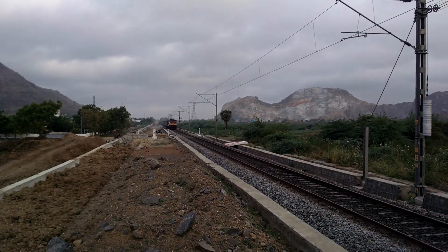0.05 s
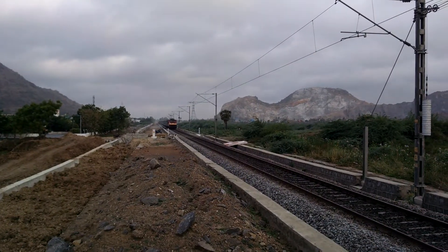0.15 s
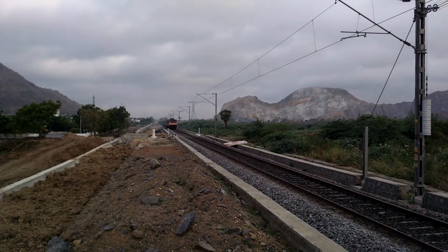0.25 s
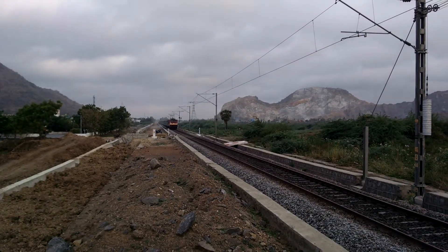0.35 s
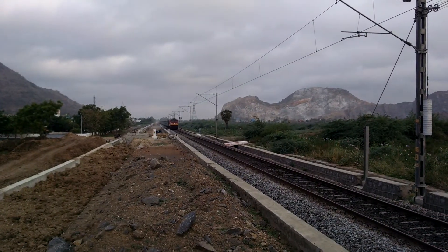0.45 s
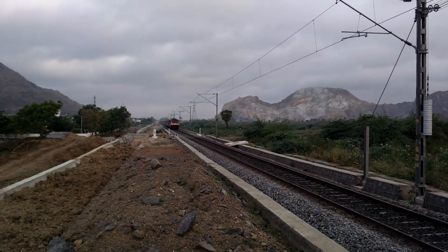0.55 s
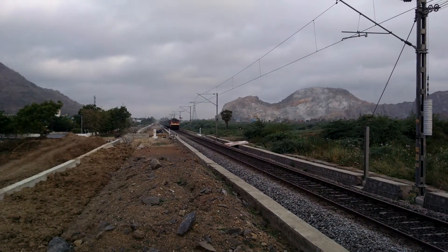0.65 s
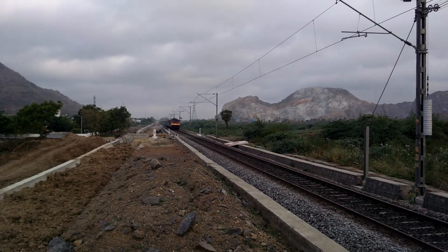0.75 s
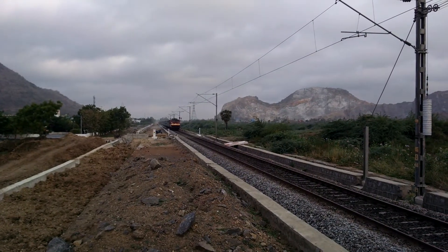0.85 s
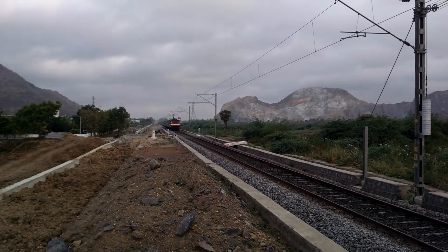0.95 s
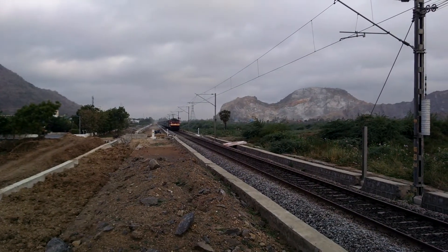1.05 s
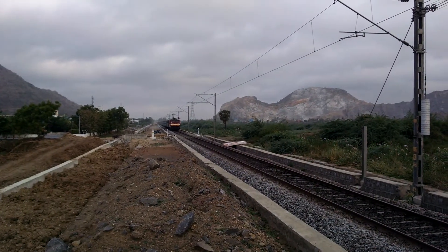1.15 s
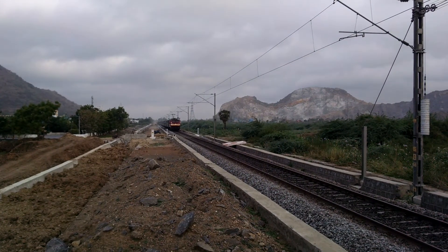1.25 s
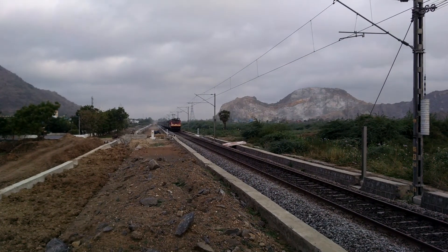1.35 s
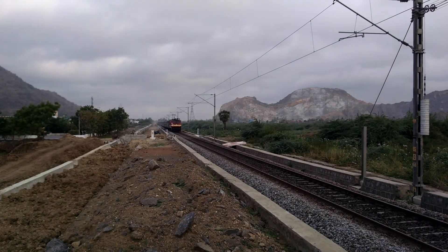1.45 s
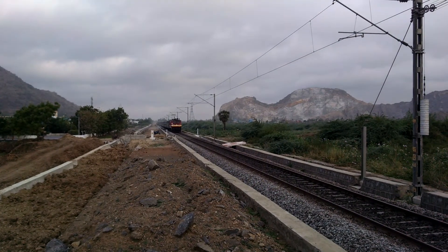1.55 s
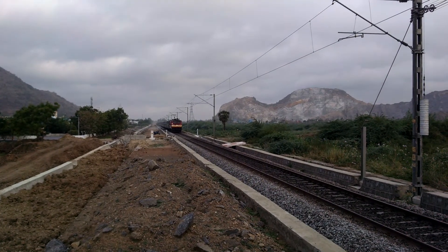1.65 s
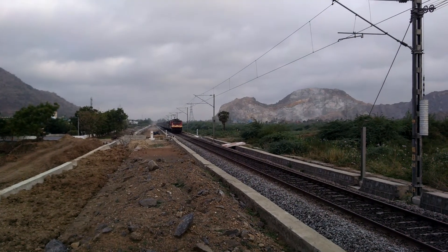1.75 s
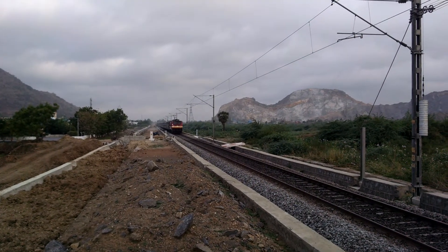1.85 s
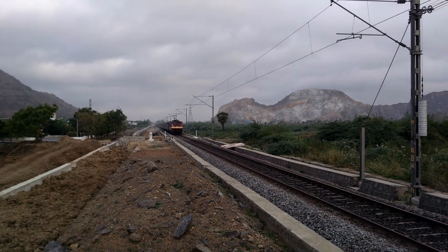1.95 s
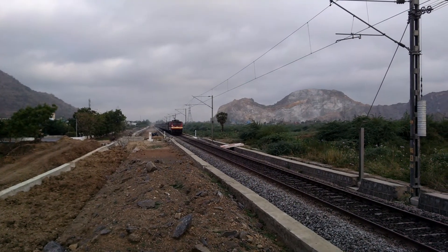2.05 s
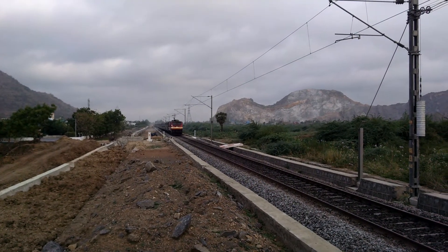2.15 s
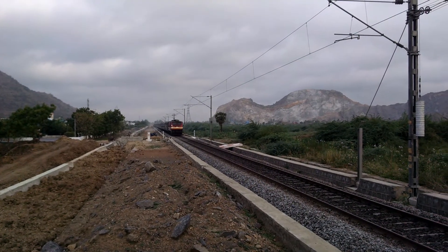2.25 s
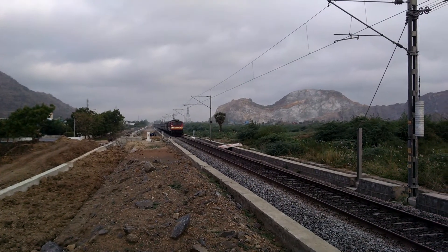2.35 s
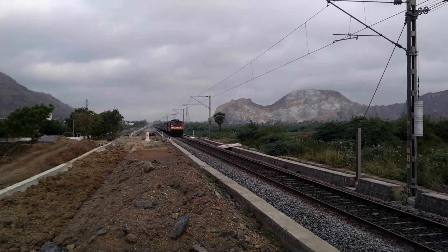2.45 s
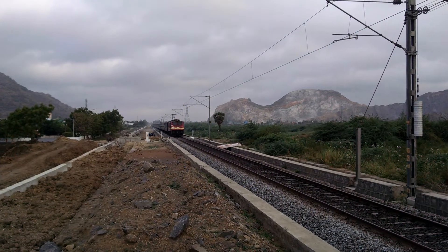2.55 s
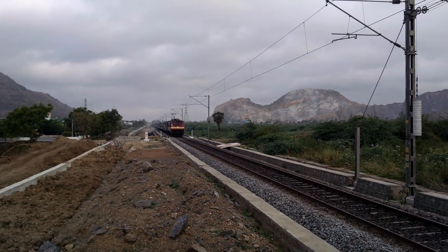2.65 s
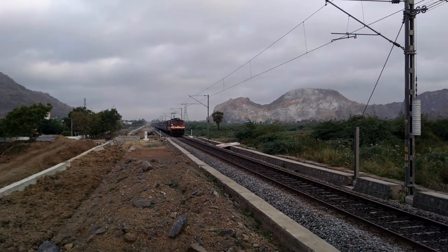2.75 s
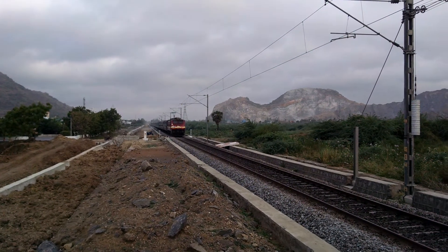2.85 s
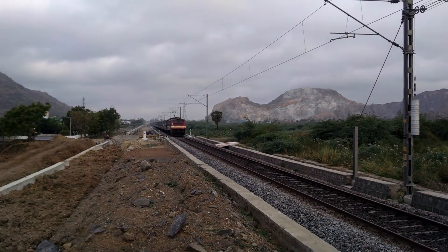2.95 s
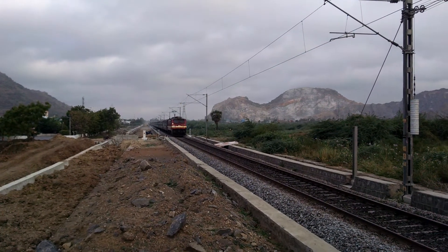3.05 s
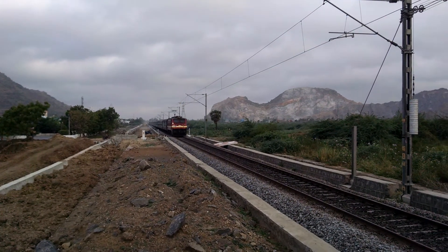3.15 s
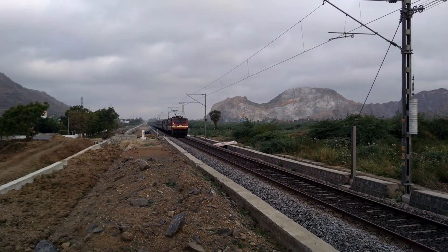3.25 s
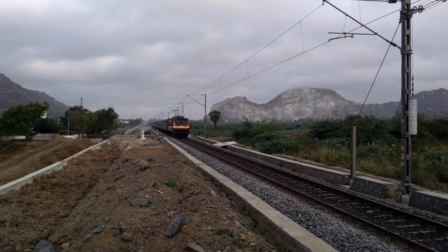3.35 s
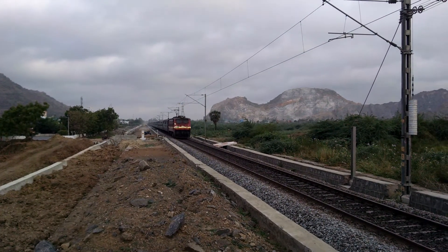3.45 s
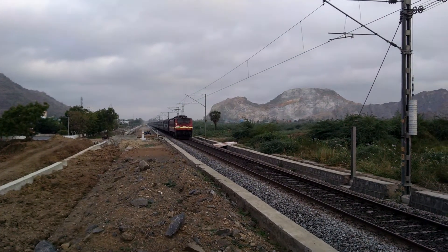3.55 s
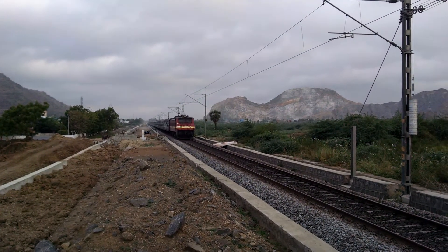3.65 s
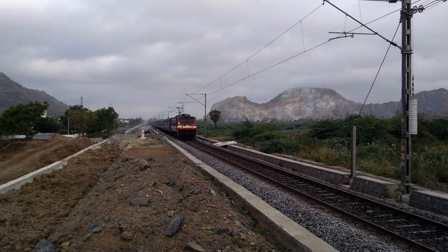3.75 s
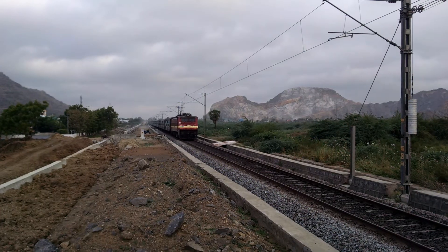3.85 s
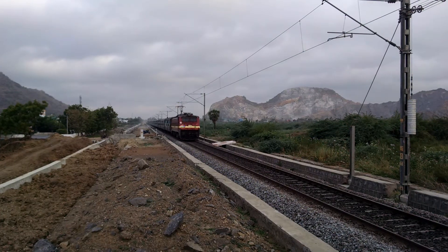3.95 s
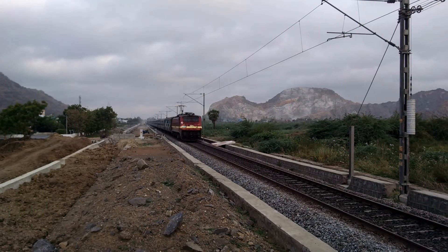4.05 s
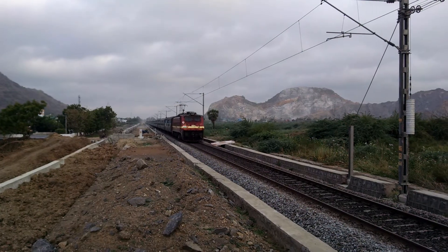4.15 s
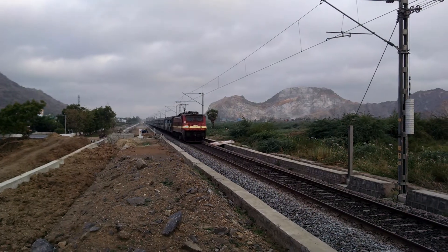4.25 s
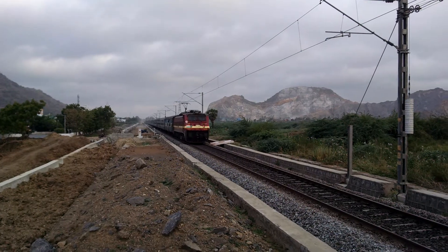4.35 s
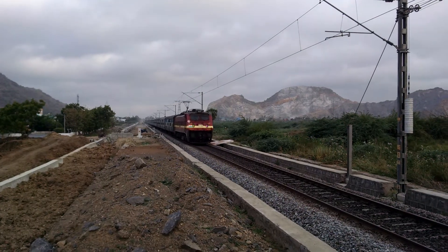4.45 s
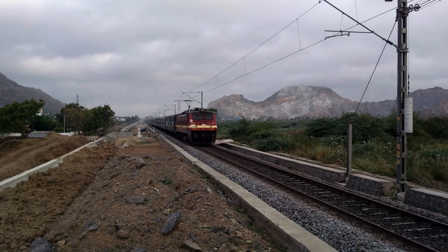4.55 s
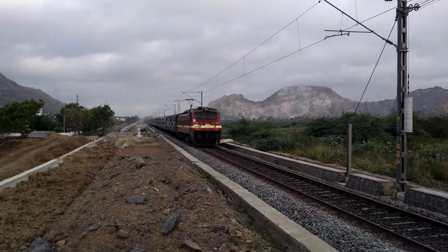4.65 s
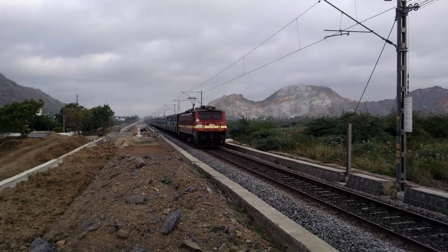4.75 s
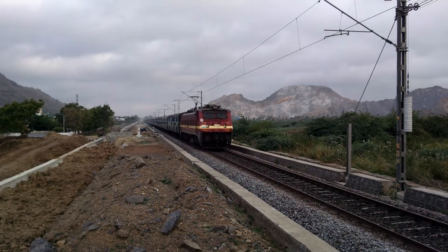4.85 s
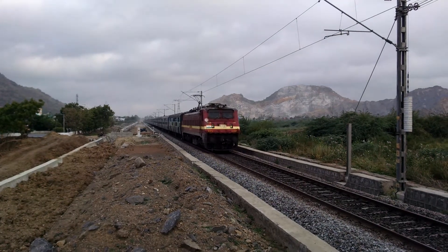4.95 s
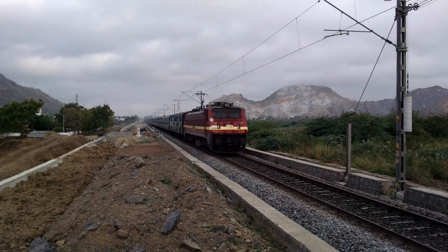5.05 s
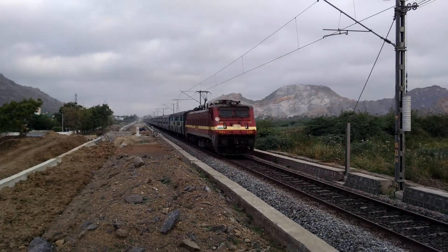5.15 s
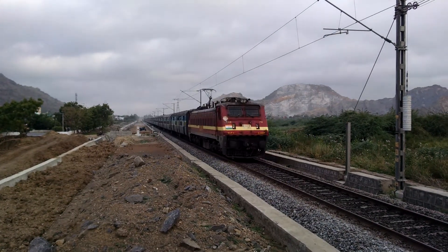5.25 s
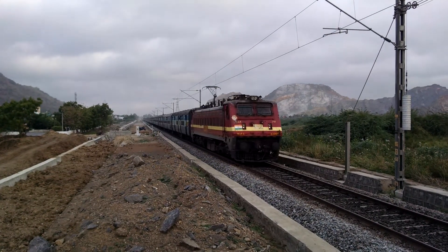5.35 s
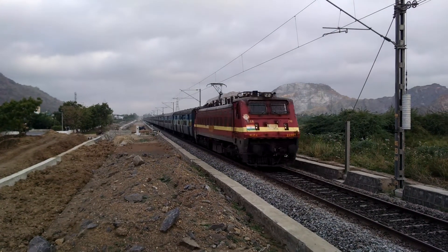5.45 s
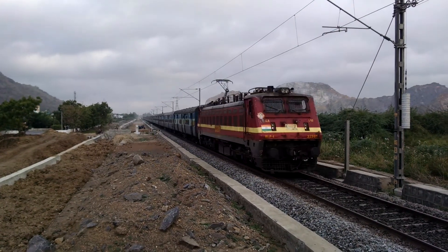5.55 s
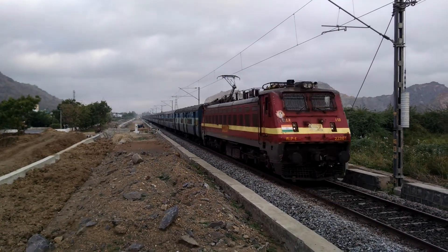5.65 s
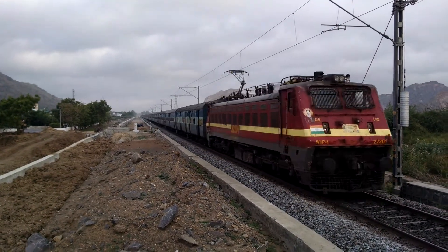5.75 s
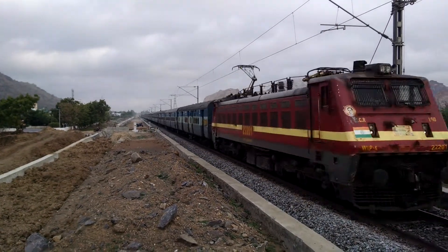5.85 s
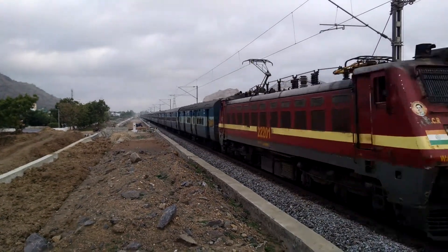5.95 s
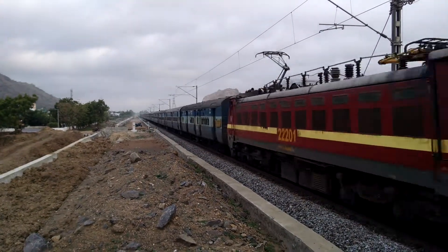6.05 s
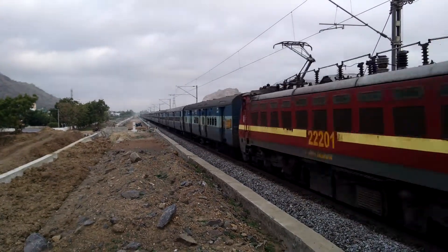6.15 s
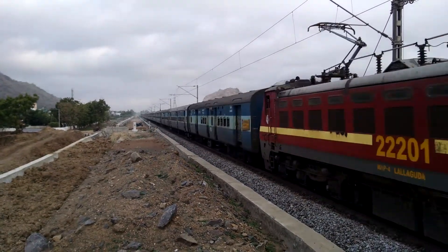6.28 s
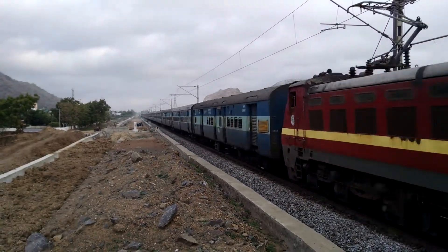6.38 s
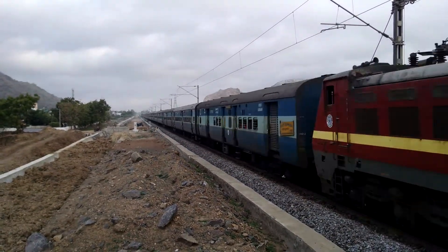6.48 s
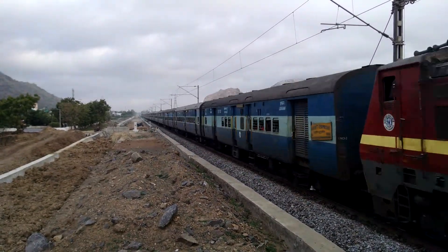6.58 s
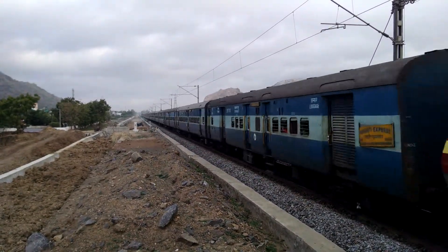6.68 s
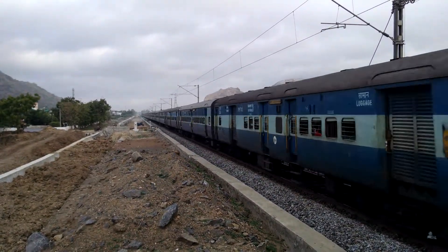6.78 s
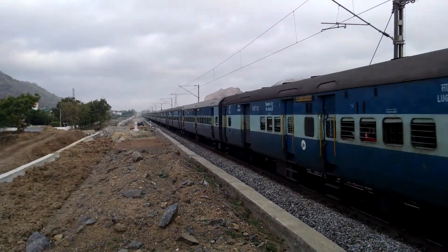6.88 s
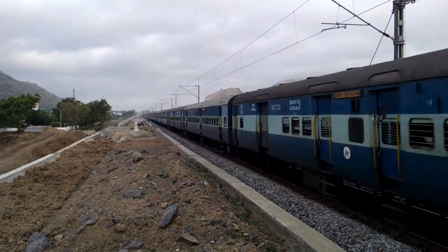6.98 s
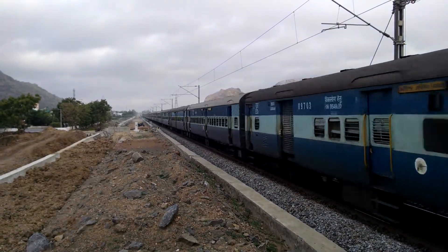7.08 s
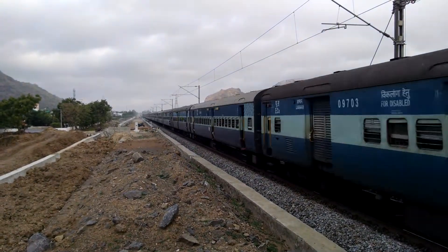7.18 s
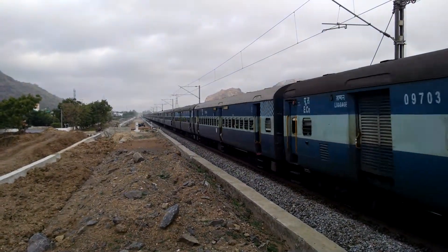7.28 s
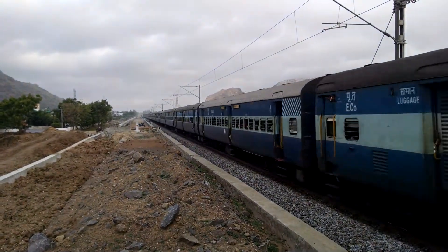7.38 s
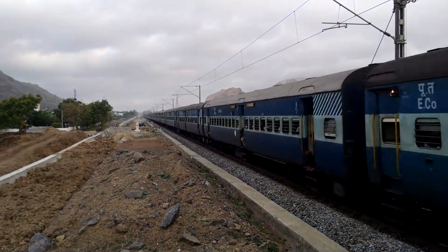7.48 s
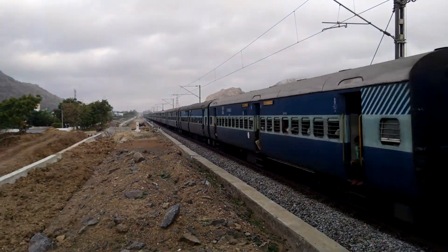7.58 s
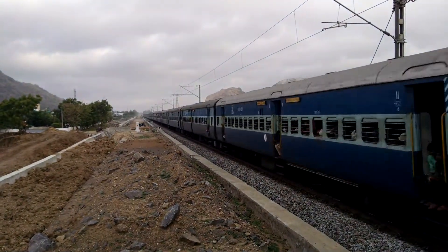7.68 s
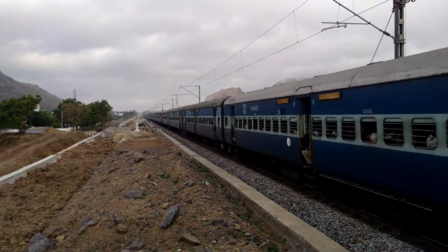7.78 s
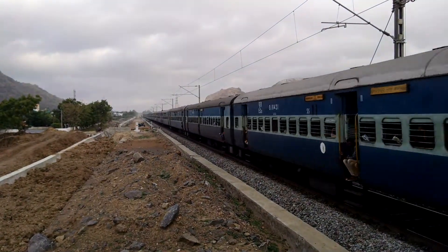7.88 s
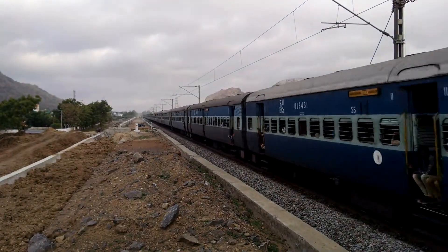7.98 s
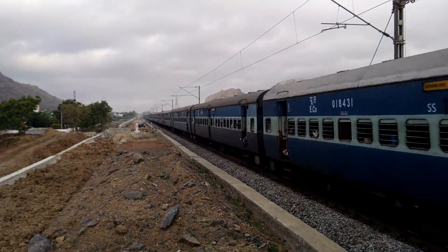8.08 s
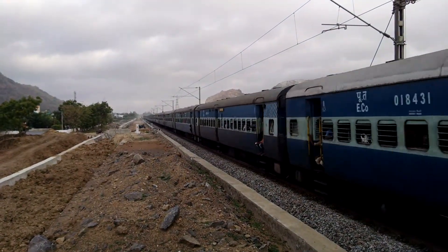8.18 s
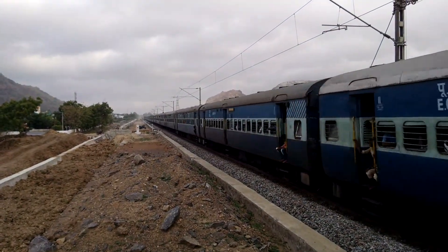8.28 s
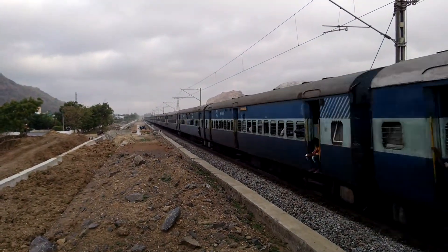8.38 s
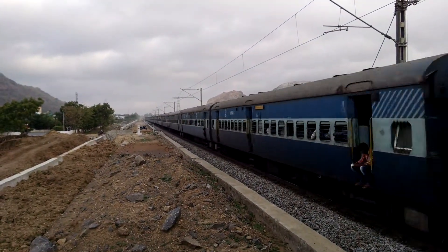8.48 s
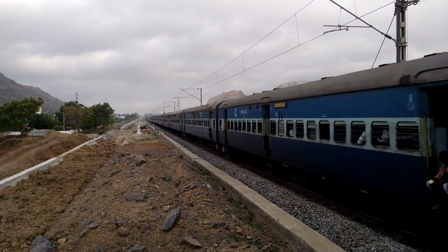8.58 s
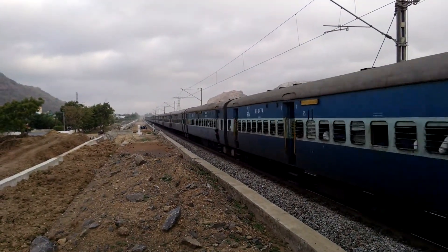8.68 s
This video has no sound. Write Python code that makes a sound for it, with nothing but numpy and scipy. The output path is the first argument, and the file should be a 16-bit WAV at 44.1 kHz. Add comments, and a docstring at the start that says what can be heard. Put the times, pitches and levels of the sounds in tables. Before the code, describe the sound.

A faint far rush with a chirping bird, one long blaring train horn with echoes, then an electric passenger train roars past with paired rail clacks.

```python
"""A deep hum that soon stops and a faint far rush come first, with swells of rumble and a small bird.
One long air-horn blast follows, and the land throws it back lower: reed harmonics plus echo copies.
Then an electric train passes close by: shaped noise roars for the locomotive, then for its coaches.
Paired clicks ring the modes of the rail as axles clack over a joint; loose gear knocks and rattles.
"""
import sys
import numpy as np
from scipy import signal
from scipy.fft import rfft, irfft
from scipy.io import wavfile
from scipy.ndimage import uniform_filter1d

SR = 44100
rng = np.random.default_rng(int(sys.argv[2]) if len(sys.argv) > 2 else 0)


def wav_record(signal):
    """Record a signal, one row per channel, as 16-bit PCM in the file named by sys.argv[1]."""
    frames = np.transpose(np.atleast_2d(signal))
    bounded = np.clip(frames, -1, 1)
    # unit amplitude maps onto the largest positive 16-bit level
    quanta = np.round(bounded * 32767).astype(np.int16)
    wavfile.write(sys.argv[1], SR, quanta)


N = 384552
T = np.arange(N) / SR  # time of each sample, s
HZ = np.maximum(np.fft.rfftfreq(N, 1 / SR), 1)  # frequency of each spectrum bin


def from_db(db):
    """Turn decibels into gain."""
    return 10 ** (np.asarray(db) / 20)


def rms_one(x):
    """Scale to unit power."""
    return x / np.sqrt(np.mean(x ** 2) + 1e-20)


def in_time(rows, t=T):
    """Read each column of a curve at times t, with straight lines between its rows."""
    s, *columns = np.transpose(rows)
    return [np.interp(t, s, c) for c in columns]


def at_hz(points, hz):
    """Read a frequency table on a logarithmic axis."""
    f, value = np.transpose(points)
    return np.interp(np.log(hz), np.log(f), value)


def drift(rate, t=T):
    """Wander at random around 0, heading for a new value `rate` times a second."""
    knots = rng.standard_normal(4096)
    return np.interp(t * rate, np.arange(len(knots)), knots)


def cut(x, hz, kind, order=2):
    """Filter out what lies outside a low, high or middle band (Butterworth)."""
    return signal.sosfilt(signal.butter(order, hz, kind, fs=SR, output="sos"), x)


def band_noise(low_hz, high_hz, shape=N):
    """Make noise of unit power between two frequencies."""
    return rms_one(cut(rng.standard_normal(shape), [low_hz, high_hz], "band"))


def smooth(x, seconds):
    """Follow a signal with a lag, as a one-pole filter does."""
    r = np.exp(-1 / (seconds * SR))
    return signal.lfilter([1 - r], [1, -r], x)


def sides(balance, share=1):
    """Give the left and right gain at each frequency while the total power stays the same."""
    ratio = from_db(share * at_hz(balance, HZ))
    return np.array([ratio, np.ones_like(ratio)]) * np.sqrt(2 / (1 + ratio ** 2))


# Colour of the rolling noise far off, beside the locomotive and beside the coaches.
# Each row: frequency in Hz, relative level in dB per Hz.
FAR_COLOUR = [(20, -1), (45, -0.5), (120, -6), (190, -2), (400, 2.5), (550, -3), (850, -3), (1150, -13),
              (1600, -8.5), (2250, -15.5), (2700, -12.5), (3400, -13.5), (3900, -13), (4500, -22),
              (5100, -21.5), (5700, -25), (6800, -26), (10000, -40), (15500, -60)]
LOCOMOTIVE_COLOUR = [(20, -4.5), (40, -4.5), (100, -4), (220, 0), (460, -1), (580, -4), (780, 0),
                     (1050, -14), (1600, -13), (2250, -18), (2700, -18), (3200, -17.5), (3900, -19.5),
                     (5000, -27.5), (7200, -30), (10000, -37.5), (15500, -54.5)]
COACH_COLOUR = [(20, -20), (90, -4.5), (190, -7), (350, -3), (470, 0.5), (600, -4.5), (810, -9),
                (1000, -10), (1180, -12.5), (1600, -18), (3800, -18.5), (5000, -26), (7200, -30),
                (10000, -37), (15500, -59)]
# How alike left and right are for the far train. Each row: frequency in Hz, likeness from 0 to 1.
FAR_LIKENESS = [(40, .24), (130, 0.76), (400, 0.93), (550, .5), (800, 0.84), (1400, 0.82), (1900, 0.97),
                (2250, 0.58), (2600, 1), (2850, 0.96), (3250, 0.27), (3600, 0.98), (4150, 0.63),
                (4480, 0.44), (4900, .88), (5500, 0.79), (6300, .66), (7400, .88), (7800, 0.47),
                (8400, .99), (9200, 1), (15000, 0.96)]
# Left minus right for sound from alongside. Each row: frequency in Hz, difference in dB.
ALONGSIDE = [(60, 1.5), (700, 0), (1400, 2.5), (2050, 5.5), (2600, -0.5), (5000, 6.5), (10000, 1)]
# Track resonances, then the thin singing of the coaches' wheels.
# Each row: frequency in Hz, width in Hz, boost in dB.
TRACK_RESONANCES = [(440, 61, 4.5), (780, 34, 1), (1156, 200, 4.5)]
WHEEL_RINGS = [(1970, 200, 4.5), (8000, 150, 3)]
# Roar of wheels on rails as the train nears and goes by, before the small changes added below.
# Each row: time in seconds, level in dB.
ROAR = [(0, -33.5), (3.0, -33), (4.3, -34.5), (4.74, -28.5), (4.85, -25.5), (5.02, -25), (5.15, -22.5),
        (5.45, -19.5), (5.93, -19.5), (6.0, -18.5), (6.15, -18), (6.22, -20.5), (6.3, -17), (6.41, -16.5),
        (6.61, -20), (6.78, -17.5), (6.88, -19.5), (6.95, -24), (7.1, -22.5), (7.8, -20), (8.02, -22.5),
        (8.25, -22), (8.47, -23.5), (8.72, -19.5)]
# the roar swells as a wheel runs up to the joint and drops once it is over;
# the dB figure is for a blow of 0 dB
RUN_UP_S, RUN_OFF_S, RUN_UP_DB = 0.017, 0.008, 5
SLEEPER_HZ = 42.8


def rolling(far_db=4.0, loco_db=0.68, coach_db=1.37, sleeper_depth=0.027, shake_db=1.18,
            waver_db=0.42, hiss_evenness=0.21):
    """Rough wheels shake the track: a thin far rush, the locomotive's deep roar, then ringing coaches."""
    roar, = in_time(ROAR)
    roar = roar + waver_db * drift(8)
    for s, db in axles():
        distance = np.maximum((s - T) / RUN_UP_S, (T - s) / RUN_OFF_S).clip(max=20)
        roar = roar + RUN_UP_DB * from_db(db) * np.exp(-distance)
    # fades: far rush to locomotive, ahead to alongside, locomotive to coaches (start and end in s)
    fades = [(3.8, 5.39), (5.5, 6.42), (6.8, 7.05)]
    near, beside, behind = [np.clip((T - a) / (b - a), 0, 1) for a, b in fades]
    ringing = boosts(TRACK_RESONANCES)
    engine = from_db(at_hz(LOCOMOTIVE_COLOUR, HZ)) * ringing
    coach = from_db(at_hz(COACH_COLOUR, HZ)) * ringing * boosts(WHEEL_RINGS)

    far = from_db(far_db) * rush(from_db(at_hz(FAR_COLOUR, HZ)), ahead(share=1.0), FAR_LIKENESS)
    loco_ahead = np.sqrt(1 - beside) * rush(engine, ahead(share=0.59))
    loco_beside = np.sqrt(beside) * rush(engine, sides(ALONGSIDE))
    loco = from_db(loco_db) * (loco_ahead + loco_beside)
    coaches = from_db(coach_db) * rush(coach, sides(ALONGSIDE))
    x = np.sqrt(1 - near) * far + np.sqrt(near * (1 - behind)) * loco + np.sqrt(behind) * coaches
    x = surges(x, low_db=1.7, high_db=0.87)

    # the hiss comes from a long stretch of rail, so it swells less than the roar of the nearest bogie
    swell_db = roar - uniform_filter1d(roar, SR // 2)
    x = x + (from_db(-hiss_evenness * swell_db) - 1) * cut(x, 1900, "high", order=1)
    # close by, the noise throbs as the wheels cross each sleeper
    throb = 1 + sleeper_depth * beside * np.sin(2 * np.pi * SLEEPER_HZ * T + drift(5.9))
    return x * throb * from_db(roar + shake_db * near * drift(28))


# How alike left and right are for the passing train. Each row: frequency in Hz, likeness from 0 to 1.
PASSING_LIKENESS = [(40, 0.24), (100, 0.96), (450, 0.86), (600, 0.92), (1200, 1), (1900, 0.4), (2600, 0.91),
                    (2800, 0.93), (3250, 0.21), (3850, 0.93), (4700, 0.81), (5300, 0.61), (7800, 0.5),
                    (8300, 1), (8900, 1), (15000, 1)]


def rush(colour, ears, likeness=PASSING_LIKENESS):
    """Make partly alike stereo noise from a shared and an opposed part, unit power from 300 to 2000 Hz."""
    mid, side = rng.standard_normal((2, len(HZ))) + 1j * rng.standard_normal((2, len(HZ)))
    alike = np.clip(at_hz(likeness, HZ), 0, 1)
    pair = np.sqrt(1 + alike) * mid + np.sqrt(1 - alike) * side * [[1], [-1]]
    power = 8 * np.sum(colour[(HZ > 300) & (HZ < 2000)] ** 2)
    return irfft(pair * colour * ears, N) * N / np.sqrt(power)


# Left minus right for sound from far down the line. Each row: frequency in Hz, difference in dB.
AHEAD = [(55, 1), (120, 6), (380, 12.5), (750, 9.5), (1300, 3.5), (1900, 2), (2250, 3.5), (2700, 0),
         (3400, -1.5), (4300, 1), (5100, 1.5), (5700, 3), (10000, -0.5)]
# Extra phase by which the left ear leads for that sound. Each row: frequency in Hz, lead in radians.
AHEAD_LEAD = [(40, 0.17), (120, 0.67), (400, 1.9), (600, 1.8), (900, 1.4), (1100, 0)]


def ahead(share):
    """Give the level and phase at each ear for sound from down the line."""
    return sides(AHEAD, share) * np.exp(-1j * share * at_hz(AHEAD_LEAD, HZ) * [[0], [1]])


def boosts(resonances):
    """Give the gain of a set of resonances, each a peak in dB that falls off to both sides."""
    return from_db(sum(db / (1 + (2 * (HZ - hz) / width) ** 2) for hz, width, db in resonances))


def surges(x, low_db, high_db):
    """Let each octave swell and sink on its own, the low ones most."""
    spectrum, out = rfft(x), 0
    octave = np.clip(np.log2(HZ / 90), 0, 6)
    for k, depth_db in enumerate(np.linspace(low_db, high_db, 7)):
        band = irfft(spectrum * np.maximum(1 - abs(octave - k), 0), N)
        out = out + band * from_db(depth_db * drift(13))
    return out


# Bogies (wheel frames with two axles) crossing the joint.
# Each row: time in seconds, leading axle's relative blow in dB, trailing axle's relative blow in dB.
BOGIES = [(6.046, -21, -20), (6.347, -33, -16), (6.765, -20, -9.5), (7.06, -11.5, -17), (7.650, -3.5, -7),
          (7.950, -4.5, -5), (8.539, -3, -6.5)]
AXLE_GAP_S = .1152


def axles():
    """List two blows for each bogie, one axle gap apart, as (time in s, level in dB)."""
    blows = []
    for s, leading_db, trailing_db in BOGIES:
        blows += [(s, leading_db), (s + AXLE_GAP_S, trailing_db)]
    return blows


def clacks(level_db=0.1, rattle_db=-23, rattles_per_s=40, shudder_db=-15, shudder_s=0.045,
           grit_db=-26.5, crunch_db=-15, crunch_s=0.0032):
    """Axles hit the joint in pairs and the bogie shudders after each blow; loose gear rattles at random."""
    clicks, shudder, contact = np.zeros((3, N))
    for s, db in axles():
        at = round(s * SR)
        clicks[at] = from_db(db + level_db)
        shudder[at:] += from_db(db) * np.exp(-T[:N - at] / shudder_s)
        contact[at:] += from_db(db) * np.exp(-T[:N - at] / crunch_s)
    # the wheel grinds over the rail end for a few milliseconds, which gives the blow its body
    clicks += from_db(crunch_db) * contact * cut(rng.standard_normal(N), 1750, "low")
    clicks += from_db(shudder_db) * shudder * (rng.random(N) < 1500 / SR) * rng.standard_normal(N)
    loose = (rng.random(N) < rattles_per_s / SR) * (T > 5.8) * rng.standard_normal(N)
    # the landing wheel scuffs the rail head with a short bright hiss
    grit = from_db(grit_db) * shudder * band_noise(1700, 8000)
    blows = cut(clicks + knocks() + from_db(rattle_db) * loose, [90, 6000], "band")
    return irfft(rfft(rail(blows) + grit) * sides(ALONGSIDE), N)


# Tones the rail rings with after a blow.
# Each row: frequency in Hz, relative level in dB, time to fade by 60 dB in seconds.
RAIL_MODES = [(266, -34, 0.018), (524, -12, 0.042), (842, -3.5, 0.11), (1142, -11, 0.061),
              (1510, -23.5, 0.033), (2120, -6, 0.0045), (3800, -23, 0.008)]


def rail(clicks, ground_s=0.002977, ground_db=-3):
    """Blows ring the rail's resonators briefly; a reflection follows about 3 ms later."""
    out = 0
    for hz, level_db, t60 in RAIL_MODES:
        r, w = from_db(-60 / (t60 * SR)), 2 * np.pi * hz / SR
        ring = signal.lfilter([0, np.sin(w)], [1, -2 * r * np.cos(w), r * r], clicks + 1e-18)
        out = out - from_db(level_db) * ring
    return out + from_db(ground_db) * np.interp(T - ground_s, T, out)


# Knocks of couplers and loose gear between the joints. Each row: time in seconds, relative level in dB.
KNOCKS = [(7.017, -12), (7.146, -15), (7.180, -14), (7.212, -11), (7.437, -14), (7.512, -17), (7.604, -16),
          (7.792, -22), (7.848, -17), (7.925, -19), (8.088, -9), (8.098, -17), (8.501, -12)]
KNOCK_TOP_HZ, KNOCK_DB = 900, 2.5  # KNOCK_DB raises every knock


def knocks():
    """Slack couplers and loose gear give duller blows than the wheels."""
    clicks = np.zeros(N)
    for s, db in KNOCKS:
        clicks[round(s * SR)] = from_db(db + KNOCK_DB)
    return cut(clicks + 1e-18, KNOCK_TOP_HZ, "low")


SQUEAL_HZ, SQUEAL_WIDTH_HZ, SQUEAL_HALF_S, SQUEAL_DB = 11800, 90, 0.053, -56


def squeal():
    """Each jolt makes the wheel sing very high: a narrow band of noise flares around every blow."""
    envelope = sum(np.exp(-((T - s) / SQUEAL_HALF_S) ** 2) for s, db in axles())
    tone = band_noise(SQUEAL_HZ - SQUEAL_WIDTH_HZ / 2, SQUEAL_HZ + SQUEAL_WIDTH_HZ / 2)
    return from_db(SQUEAL_DB) * envelope * tone


# Horn echoes. Each row: delay in seconds, pitch ratio, relative level in dB, tilt in dB per octave.
ECHOES = [(.1, .876, -26, 0.5), (.66, .936, -29.5, 2.5), (.8, .873, -32, 1)]
# Colour that the land gives the echoes. Each row: frequency in Hz, gain in dB.
ECHO_COLOUR = [(340, -10), (370, 3), (695, 3), (750, -6), (1030, -5), (1125, 4), (1500, 1.5), (1850, 1),
               (2300, 8.5)]
# Left minus right for the horn's direct tone. Each row: frequency in Hz, difference in dB.
HORN_SIDES = [(400, 15), (800, 8), (1200, 3), (1980, 3), (2380, -7), (2780, 8), (3200, 7), (5000, 4),
              (10000, 2)]
RASP_LOW_HZ, RASP_HIGH_HZ = 3600, 9400


def horn(level_db=4.5, puff_s=3.153, puff_db=-27):
    """The train's speed raises the direct tone; echoes from the sides are raised less and sound flat."""
    direct, rasp = blast(0, 1, 0, flutter_db=.6, jitter=.0015, count=38)
    air = rasp * band_noise(RASP_LOW_HZ, RASP_HIGH_HZ, (2, N))
    echoes = 0
    for delay, ratio, db, tilt_db in ECHOES:
        echo, _ = blast(delay, ratio, tilt_db, flutter_db=2.2, jitter=.005, count=7)
        echoes = echoes + from_db(db) * echo
    # a dull puff of air leaves the horn as the reed begins to speak
    puff = from_db(puff_db) * rms_one(cut(rng.standard_normal(N), 400, "low"))
    puff = puff * np.exp(-((T - puff_s) / 0.017) ** 2)
    returned = rfft(blurred(echoes)) * from_db(at_hz(ECHO_COLOUR, HZ)) + rfft(scrub_echoes() + puff)
    return from_db(level_db) * (air + irfft(rfft(direct) * sides(HORN_SIDES) + returned * sides(AHEAD), N))


# Partials of the horn's tone. Each row: multiple of the basic pitch, relative rms level in dB.
HORN_PARTIALS = [(1, -14), (2, -13.5), (3, -20), (4, -27), (5, -26), (6, -31), (7, -34), (8, -27.5),
                 (9, -38), (10, -40.5), (11, -40), (12, -42), (13, -33), (14, -40), (15, -39.5),
                 (16, -42.5), (17, -40), (18, -42), (19, -46.5), (20, -43), (22, -57), (24, -49), (27, -65),
                 (31, -64), (38, -69)]
# Air pressure on the reed. Each row: time in seconds, effort in dB.
EFFORT = [(3.19, -1), (3.38, -0.67), (3.55, 0), (3.66, -2), (3.78, -2.5), (3.86, -2.5), (3.92, -1),
          (3.98, -2.5), (4.12, -5.5), (4.2, -14)]
# the valve opens and shuts; higher octaves of partials speak later and die earlier
HORN_ON_S, HORN_OFF_S, ATTACK_S, RELEASE_S = 3.138, 4.22, 0.03, 0.062
LAG_S_PER_OCTAVE, CLOSE_S_PER_OCTAVE = 0.0088, 0.034
# the reed starts sharp, settles, then creeps upward
HORN_HZ, SHARP_HZ, SETTLE_S, CREEP_HZ_PER_S = 389.2, 26.57, .08, 14.7
HORN_HITCH_S = 3.9025  # the tone skips a fraction of a cycle
# extra dB for each dB of effort: blare of the middle partials, sizzle of the top ones
BLARE, SIZZLE = 0.95, 4.2
RASP_DB = -46  # before effort and the horn's overall level


def blast(delay, ratio, tilt_db, flutter_db, jitter, count):
    """A blown reed gives partials, brighter with effort, that flutter in moving air, and a pulsing rasp."""
    live = (T > HORN_ON_S + delay) & (T < HORN_OFF_S + delay)
    t = T[live] - delay
    age = t - HORN_ON_S
    pitch = HORN_HZ + SHARP_HZ * np.exp(-age / SETTLE_S) + CREEP_HZ_PER_S * age
    effort, = in_time(EFFORT, t)
    multiples, partial_db = np.transpose(HORN_PARTIALS)
    hitch = np.clip((t - HORN_HITCH_S) / .0025, 0, 1)
    phase = 2 * np.pi * np.cumsum(ratio * pitch * (1 + jitter * drift(250, t))) / SR
    tone, rasp = np.zeros((2, N))
    for k in range(1, count + 1):
        top = np.interp(k, [4, 13, 28], [0, 1, 1.5])  # how far this is a top partial
        octave = np.log2(k)
        brightness = (min(k - 1, 1) * (1 - top) * BLARE + top * SIZZLE) * effort + tilt_db * octave
        attack = np.clip((age - LAG_S_PER_OCTAVE * octave) / ATTACK_S, 0, 1) ** 2
        release = np.clip((HORN_OFF_S - CLOSE_S_PER_OCTAVE * octave - t) / RELEASE_S, 0, 1)
        flutter = flutter_db * (1 + 4.5 * top) * (1.1 * drift(11, t) + .8 * drift(60, t))
        wander = rng.normal(0, 0.33) + .02 * k * drift(70, t)  # phase, radians
        skip = 2 * np.pi * hitch * ((.24 * k + .5) % 1 - .5)
        level = from_db(np.interp(k, np.round(multiples), partial_db) + effort + brightness + flutter)
        tone[live] += np.sqrt(2) * attack * release * level * np.sin(k * phase + skip + wander)
    # air rasps through the reed once in each cycle, with the last partial's attack
    rasp[live] = attack * from_db(RASP_DB + SIZZLE * effort) * (1 + np.cos(phase))
    return tone, rasp


def scrub_echoes(level_db=-32.5, tilt_db=-7, first_s=.3, last_s=0.55, low_ratio=.885, high_ratio=0.99,
                 count=6):
    """Bushes along the line return the lowest partials, each at its own pitch, as a diffuse tail."""
    delays = rng.permutation(np.linspace(first_s, last_s, count))
    ratios = np.linspace(low_ratio, high_ratio, count)
    return from_db(level_db) * sum(blast(delay, ratio, tilt_db, flutter_db=2.2, jitter=0.01, count=2)[0]
                                   for delay, ratio in zip(delays, ratios))


# scrub and hillsides blur the echoes into a tail
BLUR_T60_S, BLUR_DB, BLUR_TOP_HZ = .8, -2, 900


def blurred(x):
    """Add a dull, dying tail of countless small reflections, made with fading noise."""
    tail = rng.standard_normal(SR) * from_db(-60 * T[:SR] / BLUR_T60_S)
    reflected = signal.fftconvolve(x, tail / np.linalg.norm(tail))[:N]
    return x + from_db(BLUR_DB) * cut(reflected, BLUR_TOP_HZ, "low")


# The bird's whistles.
# Each row: start in seconds, start pitch in Hz, end pitch in Hz, length in seconds, level in dB.
WHISTLES = [(0.788, 6650, 6650, .07, -49), (1.88, 4430, 4720, 0.11, -43), (2.84, 4600, 4530, .08, -44)]
CHIRP_START_S, CHIRP_GAP_S, CHIRP_LENGTH_S = 1.145, 0.14, 0.049
CHIRP_HZ, CHIRP_END_HZ, CHIRP_DB = 6650, 5440, -45


def bird(count=5):
    """A bird gives a few short whistles and an even run of falling chirps: gliding sine tones."""
    chirps = [(CHIRP_START_S + k * CHIRP_GAP_S, CHIRP_HZ, CHIRP_END_HZ, CHIRP_LENGTH_S, CHIRP_DB)
              for k in range(count)]
    out = np.zeros(N)
    for s, start_hz, end_hz, length, db in chirps + WHISTLES:
        n, at = int(length * SR), int(s * SR)
        phase = 2 * np.pi * np.cumsum(np.linspace(start_hz, end_hz, n)) / SR
        out[at:at + n] += from_db(db) * np.hanning(n) * np.sin(phase)
    return out


# Swells of low rumble while the train is far off.
# Each row: peak time in seconds, level in dB, half length in seconds, low edge in Hz, high edge in Hz.
SWELLS = [(0.336, -27.5, .034, 168, 432), (.6, -30, 0.039, 168, 426), (2.903, -38.5, .9, 134, 199)]


def swells():
    """The distant rumble, a low band of noise, wells up and sinks again."""
    rumble = 0
    for s, db, half_s, low_hz, high_hz in SWELLS:
        envelope = np.exp(-((T - s) / half_s) ** 2)
        rumble = rumble + from_db(db) * envelope * band_noise(low_hz, high_hz)
    return irfft(rfft(rumble) * sides(AHEAD), N)


def hum(hz=47.3, stop_s=.68):
    """A deep, slightly wavering sine, opposite in the two ears, stops abruptly."""
    tone = np.sin(2 * np.pi * hz * T) * np.clip((stop_s - T) / 0.0074, 0, 1) * from_db(.5 * drift(7.8))
    return tone * [[from_db(-12.2)], [-from_db(-9.3)]]


def scene():
    """Add up everything at the trackside."""
    return rolling() + clacks() + squeal() + horn() + bird() + swells() + hum()


LIMIT_DB, SENSE_S, DUCK_S, RECOVER_DB_PER_S = -10.5, 0.0026, 0.0061, 13


def gain_control(x):
    """Sound above the limit turns the gain down quickly; it recovers at a steady rate."""
    power = smooth(np.mean(x ** 2, axis=0), SENSE_S)
    over_db = np.maximum(10 * np.log10(power + 1e-12) - LIMIT_DB, 0)
    held_db = np.maximum.accumulate(over_db + RECOVER_DB_PER_S * T) - RECOVER_DB_PER_S * T
    return x * from_db(-smooth(held_db, DUCK_S))


# Phase by which the left port (sound opening) leads. Each row: frequency in Hz, lead in radians.
PORT_PHASE = [(0, 0), (250, 0), (560, -.55), (1050, -.4), (1550, .3), (2100, 2.4), (2600, 3.1), (3100, 3.2),
              (3500, 6.1), (4200, 6.5), (5100, 8.8), (7200, 12.6), (9300, 18.8), (12000, 25.1), (16000, 33)]
CUTOFF_HZ = 15500


def record(dry):
    """Two spaced ports shift the phase; gain ducks under loud sound, peaks clip and the top is cut."""
    lead = np.interp(HZ, *np.transpose(PORT_PHASE))
    right = irfft(rfft(dry[1]) * np.exp(-1j * lead), N)
    pair = np.clip(gain_control(np.array([dry[0], right])), -1, 1)
    return signal.sosfilt(signal.ellip(10, .1, 90, CUTOFF_HZ, fs=SR, output="sos"), pair)


dry = scene()
out = record(dry)
wav_record(out)
```